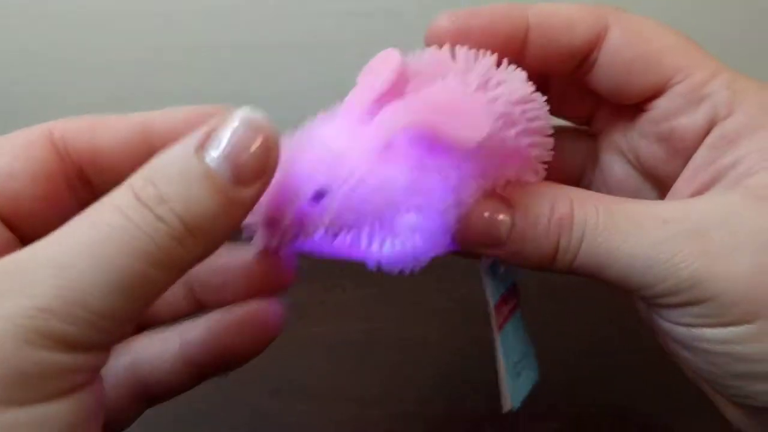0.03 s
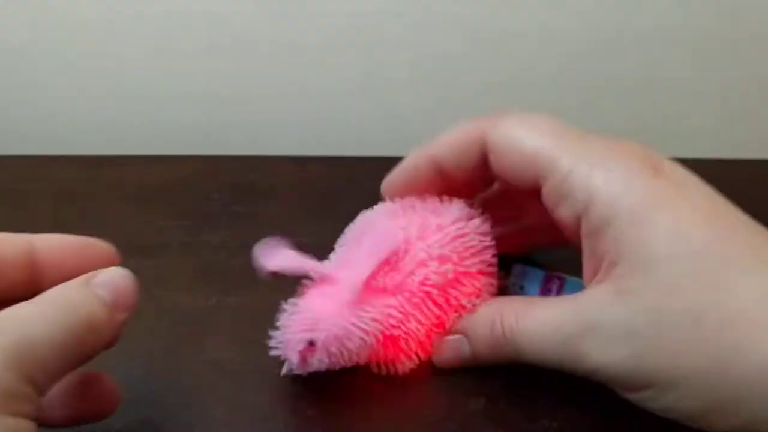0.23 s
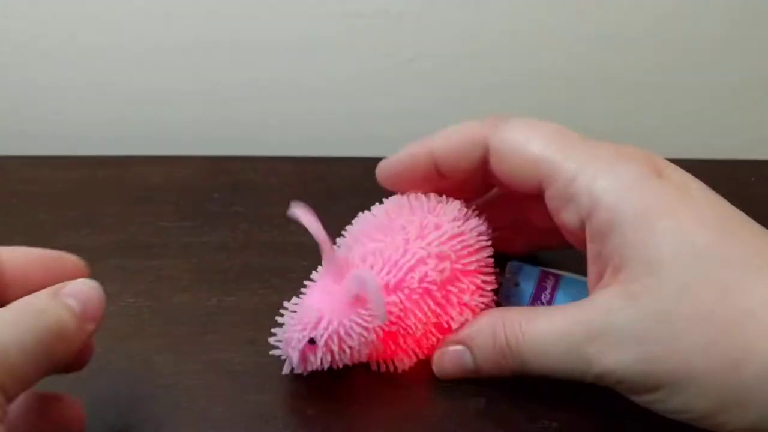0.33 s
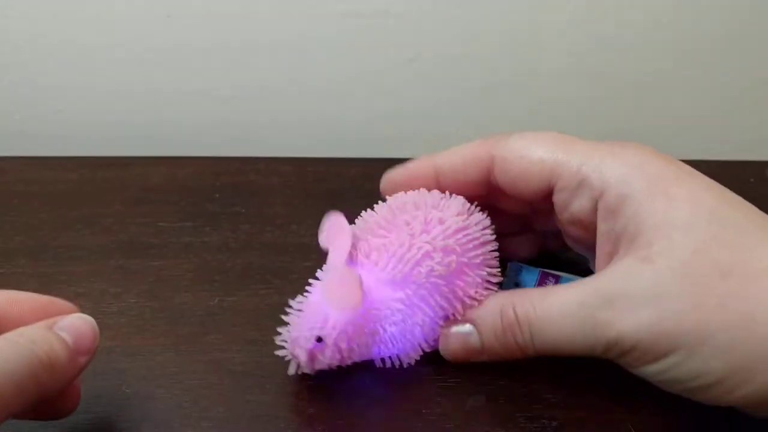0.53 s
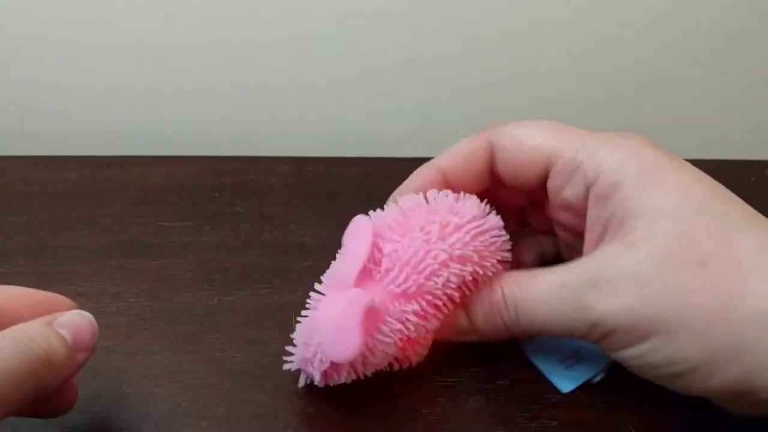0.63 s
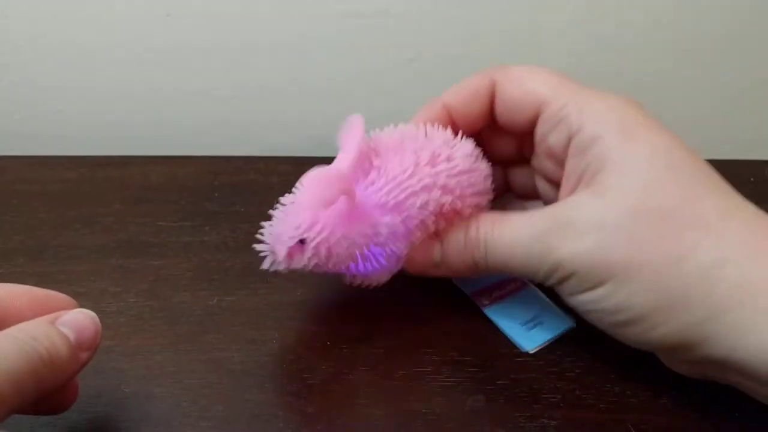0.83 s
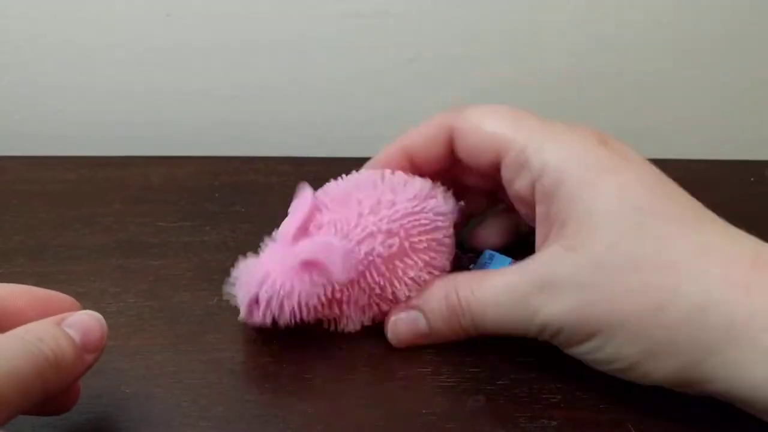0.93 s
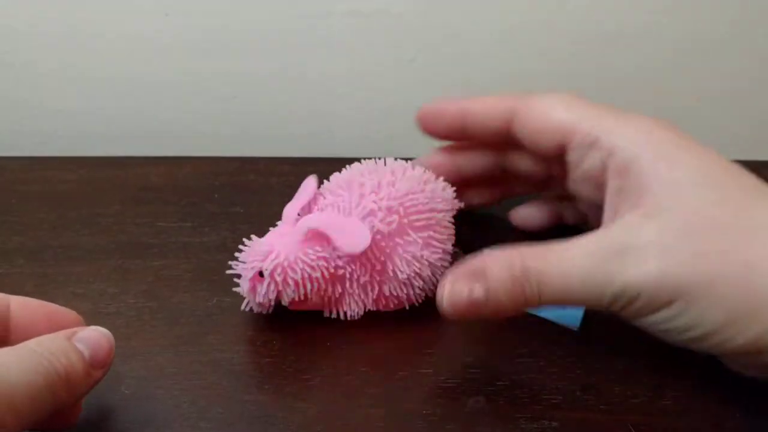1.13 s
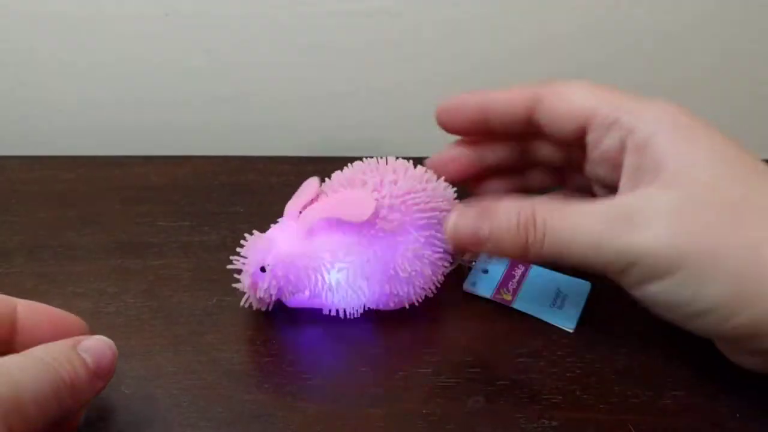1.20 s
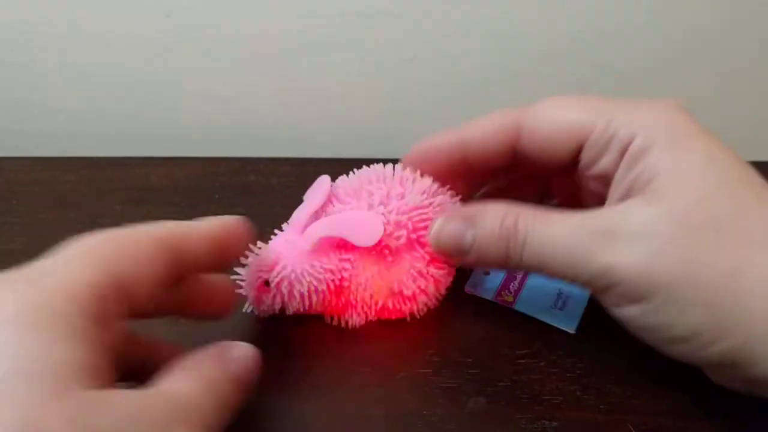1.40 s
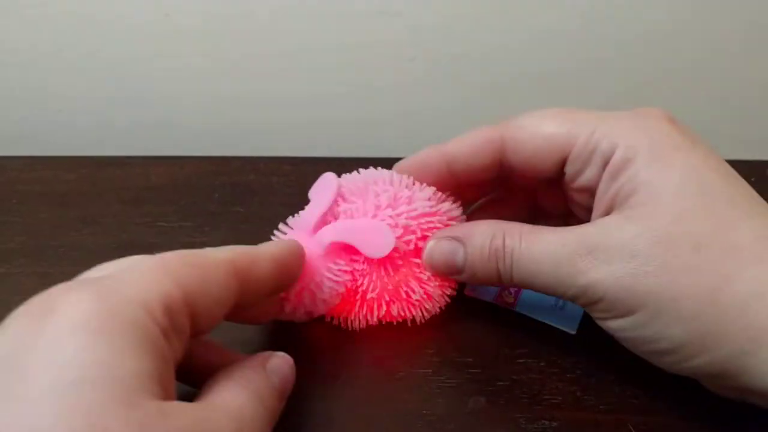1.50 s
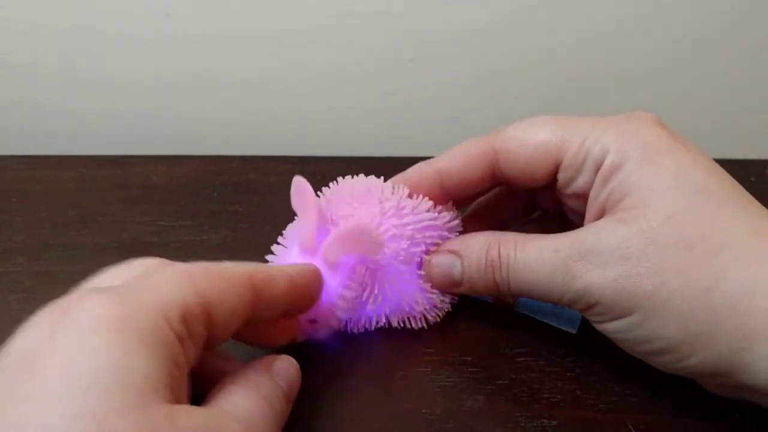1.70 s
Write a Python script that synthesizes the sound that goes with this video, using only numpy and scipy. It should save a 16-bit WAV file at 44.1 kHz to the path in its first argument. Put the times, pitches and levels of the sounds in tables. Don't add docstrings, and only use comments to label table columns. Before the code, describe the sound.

A soft spiky rubber toy is handled on a wooden table, close to the microphone. At 0.2 s it lands with a woody thump and a sharp tick, then drags with small ticks around 0.4 s. Spikes rustle against skin from 0.5 to 0.9 s. A softer set-down comes at 0.94 s, a light tick at 1.34 s, then faint hand sliding and stroking over low room rumble and hiss.

```python
import sys
import numpy as np
from scipy import signal
from scipy.fft import rfft, irfft, next_fast_len
from scipy.io import wavfile
from scipy.ndimage import uniform_filter1d

SR = 44100
rng = np.random.default_rng(int(sys.argv[2]) if len(sys.argv) > 2 else 0)


def output_pcm(signal):
    pcm = np.clip(np.atleast_2d(signal).T, -1, 1) * 32767
    wavfile.write(sys.argv[1], SR, np.round(pcm).astype(np.int16))


def gain_from_decibels(decibels):
    exponent = np.asarray(decibels, float) / 20
    return 10 ** exponent


N = 77175
TIME_S = np.arange(N) / SR


def rms_one(x):
    return x / np.sqrt(np.mean(x ** 2) + 1e-20)


def at_hz(points, hz):
    point_hz, point_db = np.array(points).T
    return np.interp(np.log(hz), np.log(point_hz), point_db)


def drift(rate_hz):
    pole = np.exp(-80 * np.pi * rate_hz / SR)
    noise = rng.standard_normal(N // 40 + 2002)
    slow = signal.lfilter([1], [1, -2 * pole, pole ** 2], noise)[2000:]
    return np.interp(np.arange(N) / 40, np.arange(len(slow)), rms_one(slow))


def ring(clicks, hz, t60_s):
    radius = gain_from_decibels(-60 / (t60_s * SR))
    w = 2 * np.pi * hz / SR
    return signal.lfilter([0, np.sin(w)], [1, -2 * radius * np.cos(w), radius ** 2], clicks + 1e-18)


def grains(per_s, spread_db):
    sizes = gain_from_decibels(spread_db * np.minimum(rng.exponential(1, N), 5))
    signs = rng.choice([-1, 1], N)
    return sizes * signs * (rng.random(N) < per_s / SR)


# (frequency [Hz], level [dB], t60 [s])
TABLE_MODES = [(72, -20.5, 0.068), (155.4, -2, 0.14), (193.6, 4, 0.06), (259, -1.5, 0.057), (360, -7, 0.14),
               (481, -10.5, 0.056), (561, -6.5, 0.05), (648.5, -4.5, 0.06), (773, 2.5, 0.016),
               (1101, -4.5, 0.026), (1378, -10, 0.047), (1739, -18.5, 0.092), (2560, -32, 0.048),
               (953, -9.5, 0.026)]
# (time [s], level [dB], contact cut-off [Hz])
PUSHES = [(0.2073, -27.5, 3000), (0.2111, -23.5, 285), (.2170, -24.5, 245), (0.167, -54.5, 1490),
          (0.232, -41.5, 890), (0.229, -25, 200), (0.252, -29.5, 200), (.284, -46.5, 1510),
          (0.315, -43.5, 290), (0.379, -47, 1500), (0.417, -43.5, 586), (.424, -42, 610),
          (0.502, -54.5, 3000), (0.567, -56.5, 2000), (0.809, -54, 3000), (.836, -57, 3000),
          (0.935, -35.5, 353), (.9395, -41, 201), (0.953, -47, 297), (.969, -51, 1200), (1.034, -53, 2000),
          (1.101, -62, 2530), (1.339, -42, 2480), (1.344, -46, 306), (1.534, -53.5, 304)]


def table_pushes():
    mode_scatter_db, pulse_len = 1.2, 512
    scatter_db = mode_scatter_db * rng.normal(0, 1, (len(PUSHES), len(TABLE_MODES)))
    t = TIME_S[:pulse_len]
    out = np.zeros(N)
    for k, (mode_hz, level_db, t60_s) in enumerate(TABLE_MODES):
        force = np.zeros(N + pulse_len)
        for (start_s, db, cut_hz), own_db in zip(PUSHES, scatter_db[:, k]):
            pulse = t * np.exp(-2 * np.pi * cut_hz * t)
            force[int(start_s * SR):][:pulse_len] += gain_from_decibels(db - 3 + own_db) * pulse / pulse.sum()
        polarity = (-1) ** max(k - 2, 0)
        out += polarity * gain_from_decibels(level_db) * ring(force[:N], mode_hz, t60_s)
    return out


# (start [s], full [s], end [s], level [dB], contacts [1/s])
SLIDES = [
    (0.323, 0.426, 0.453, -52, 2700),
    (0.792, 0.817, .85, -62.5, 1800),
    (1.006, 1.036, 1.12, -69, 960),
    (1.227, 1.526, 1.85, -61, 22000),
]
SLIDE_TILT = [0.35, .05, .1, 0.067]


def table_slides():
    out = np.zeros(N)
    for (start_s, full_s, end_s, db, per_s), tilt in zip(SLIDES, SLIDE_TILT):
        pressure = np.interp(TIME_S, [start_s, start_s + 0.024, full_s, end_s], [0.022, 0.52, 0.7, 0.035])
        slips = grains(per_s, spread_db=2.5) * pressure
        slide = np.zeros(N)
        for mode_hz, level_db, t60_s in TABLE_MODES:
            signs = rng.choice([-1, 1], N)
            slide += gain_from_decibels(tilt * level_db) * ring(slips * signs, mode_hz, 0.34 * t60_s)
        active = (TIME_S > start_s) & (TIME_S < end_s)
        out += gain_from_decibels(db) * slide / np.std(slide[active])
    return out


# (time [s], peak level [dB], t60 [s], centre [Hz])
TICKS = [(.1757, -31, .016, 2900), (.2078, -19, .009, 7500), (.2066, -34, .02, 6000),
         (.3803, -39, .016, 3200), (.4020, -31, .011, 3600), (.4152, -32, .013, 3800),
         (.4230, -32, .013, 3400), (1.3380, -32, .009, 3300), (.035, -52, .01, 2500),
         (.1885, -42, .05, 8000), (.232, -44, .012, 9000), (.247, -48, .012, 8000), (.362, -46, .01, 3000),
         (.501, -50, .01, 1500), (.652, -41, .015, 6000), (.809, -42, .015, 6500), (.835, -45, .012, 8000),
         (1.034, -45, .012, 2000), (1.102, -48, .01, 1800)]


def ticks():
    rise_s, width_oct, tail_db, tail_t60_s = 0.0004, 1.9, -20, 0.05
    size = 4096
    out = np.zeros(N + size)
    t = np.arange(size) / SR
    hz = np.arange(size // 2 + 1) * SR / size + 1
    for start_s, db, t60_s, centre_hz in TICKS:
        band = np.exp(-(np.log2(hz / centre_hz) / width_oct) ** 2)
        tone = rms_one(irfft(rfft(rng.standard_normal(size)) * band, size))
        tone = tone / (0.9 + uniform_filter1d(np.abs(tone), size=24))
        decay = gain_from_decibels(-60 * t / t60_s) + gain_from_decibels(tail_db - 60 * t / tail_t60_s)
        out[int(start_s * SR):][:size] += gain_from_decibels(db - 1) * tone * (1 - np.exp(-t / rise_s)) * decay
    return out[:N]


# (time [s], level [dB], focus [Hz], focus lift [dB])
RUB = [(.17, -63.5, 6000, 1), (0.213, -50, 4030, 1.5), (.29, -56.5, 12000, 1), (.325, -60, 4870, 1),
       (0.426, -57, 2860, 11.5), (0.521, -59.5, 11800, -5.5), (.62, -57, 5100, 5.5),
       (0.67, -53, 4750, 13.5), (0.722, -59, 6460, 6.5), (0.802, -56, 8350, 9), (0.879, -59, 8550, 4),
       (0.904, -64.5, 6000, 1.5), (0.958, -55, 3780, 3.5), (1.072, -51.5, 4050, 4.5), (1.16, -57, 9300, 4),
       (1.26, -61.5, 3900, 2), (1.432, -56, 5340, 6), (1.57, -63.5, 3700, 2.5)]
# (frequency [Hz], level [dB per Hz])
RUB_COLOUR = [(410, -35), (700, -19), (1010, -39), (1260, 6), (2040, -3), (2980, -6.5), (15800, 0)]
# (frequency [Hz], lift [dB])
SPIKE_RINGS = [(2450, 12), (3030, 10), (3880, 8.5), (4500, 7), (5050, 2), (6640, 1), (8900, -1.5),
               (11800, 0.5)]


def spikes():
    bands, grain_t60_s, focus_oct, ring_oct, patchy_db = 56, 0.0093, 0.93, 0.055, 2.5
    time_s, *columns = np.transpose(RUB)
    level_db, focus_hz, lift_db = [np.interp(TIME_S, time_s, c) for c in columns]
    slips = grains(per_s=14000, spread_db=0)
    dealt = rng.integers(0, bands, N)
    common_db = 0.4 * drift(24.6)
    pitches_hz = 15800 * np.linspace(0.12, 1, bands) ** 1.358
    out = np.zeros(N)
    for k, (hz, gap_hz) in enumerate(zip(pitches_hz, np.gradient(pitches_hz))):
        rings_db = sum(db * np.exp(-(np.log2(hz / at) / ring_oct) ** 2) for at, db in SPIKE_RINGS)
        focus_db = lift_db * np.exp(-(np.log2(hz / focus_hz) / focus_oct) ** 2)
        band_db = at_hz(RUB_COLOUR, hz) + rings_db + focus_db + common_db + patchy_db * drift(7.5)
        band = rms_one(ring(slips * (dealt == k), hz, grain_t60_s)) * np.sqrt(gap_hz)
        out += band * gain_from_decibels(band_db)
    return gain_from_decibels(level_db) * rms_one(out)


def room(x):
    t60_s, wall_cut_hz = 0.22, 2700
    size = next_fast_len(N + SR)
    w = 2 * np.pi * np.arange(size // 2 + 1) / size
    dull = 1 / (1 + 1j * w * SR / (2 * np.pi * wall_cut_hz))
    response = 0
    for k, lag_s in enumerate(rng.uniform(0.008, 0.037, 10)):
        loop = gain_from_decibels(-60 * lag_s / t60_s) * dull * np.exp(-1j * w * lag_s * SR)
        response = response + (-1) ** k * loop / (1 - loop)
    return irfft(rfft(x, size) * response, size)[:N]


def coloured(spectrum):
    hz = np.arange(N // 2 + 1) * SR / N + 1e-3
    return rms_one(irfft(rfft(rng.standard_normal(N)) * gain_from_decibels(at_hz(spectrum, hz)), N))


# (frequency [Hz], level [dB per Hz])
RUMBLE = [(15, -75), (25, -16.5), (75, 4), (184, -14), (230, -14.5), (292, -18.5), (413, -18.5), (479, -26),
          (900, -24.5), (1170, -28), (1980, -120)]


def rumble():
    return gain_from_decibels(-56.5 + 0.7 * drift(3)) * coloured(RUMBLE)


# (frequency [Hz], level [dB per Hz])
HISS = [(410, -23), (700, 12.5), (777, -1), (3970, -14), (14200, -44), (15800, 0)]


def hiss():
    return gain_from_decibels(-69) * coloured(HISS)


def scene():
    knock_cut_hz, room_db = 85, -22
    high_pass = signal.butter(2, knock_cut_hz, "high", fs=SR, output="sos")
    knocks = signal.sosfilt(high_pass, table_pushes() + table_slides() + ticks())
    mono = knocks + gain_from_decibels(room_db) * room(knocks) + spikes() + rumble() + hiss()
    return np.array([mono, mono])


def top_cut(x):
    return signal.sosfilt(signal.butter(12, 16810, fs=SR, output="sos"), x)


def record(dry):
    cutoff_hz, offset = 16150, -0.0006
    low_pass = signal.cheby2(14, 32, cutoff_hz, fs=SR, output="sos")
    mix = signal.sosfilt(low_pass, dry) + offset
    return top_cut(mix)


dry = scene()
out = record(dry)
output_pcm(out)
```